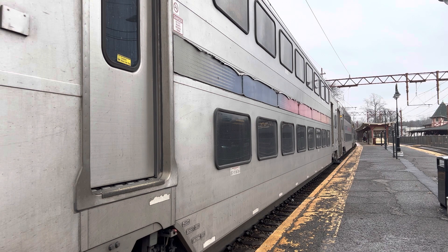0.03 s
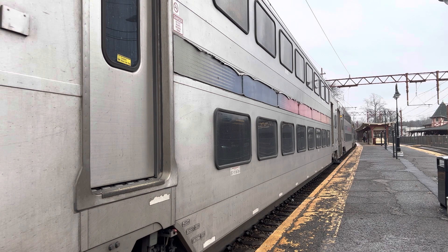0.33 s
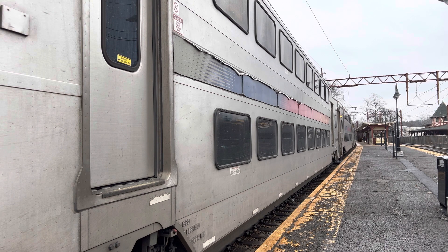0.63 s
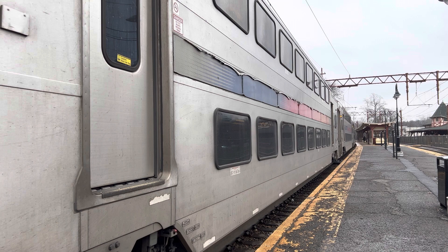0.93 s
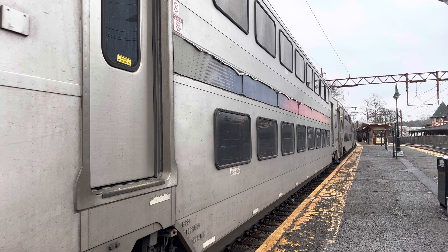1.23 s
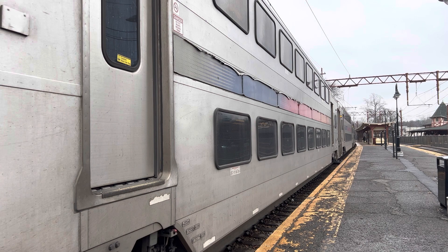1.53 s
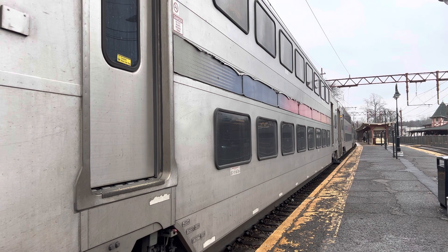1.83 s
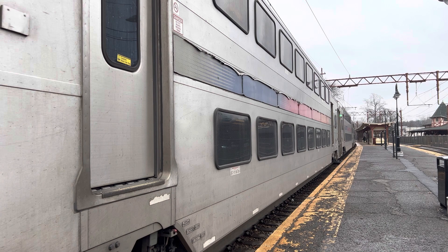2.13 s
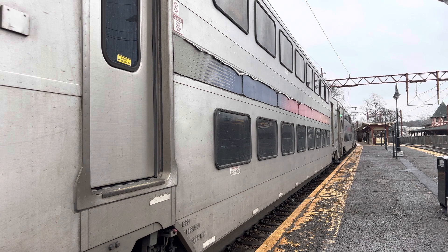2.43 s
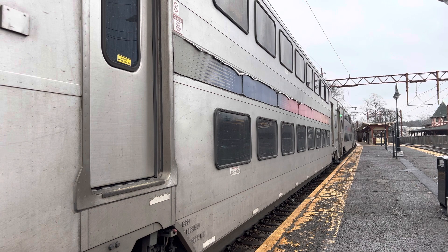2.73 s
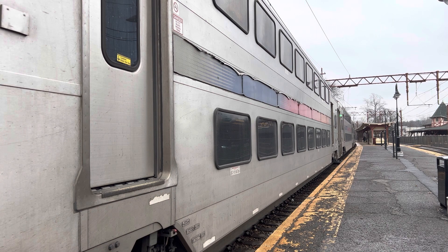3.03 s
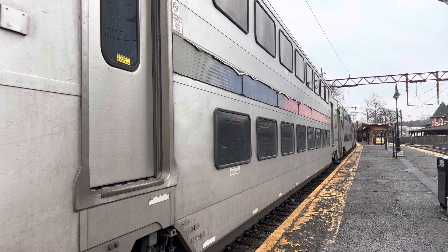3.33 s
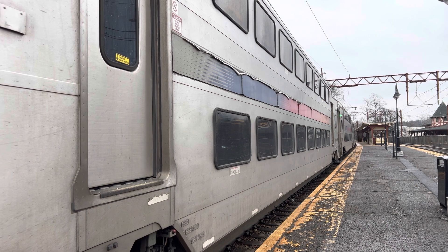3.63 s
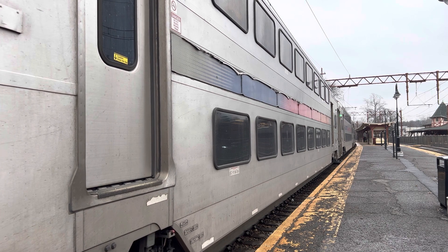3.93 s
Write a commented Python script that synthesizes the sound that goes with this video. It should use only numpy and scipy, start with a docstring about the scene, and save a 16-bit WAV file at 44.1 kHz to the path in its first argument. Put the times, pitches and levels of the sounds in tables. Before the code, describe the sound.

Air hisses loudly from a stopped train's brakes and slowly fades over a low rumble.

```python
"""A stopped passenger train lets the air out of its brakes, heard from the platform.
At first an earlier hiss is dying away over machinery that rumbles, blows and hums throughout.
At 0.44 s the valve opens with a bright spurt; the jet hisses, spits and roars in the hollow under the car.
As the pressure drains, pipe resonances sing out in turn, while a motor speeds up and slows again.
By the end the jet has sunk into a soft wash of air from cars further down the train."""
import sys
import numpy as np
from scipy import signal
from scipy.fft import rfft, irfft, next_fast_len
from scipy.io import wavfile
from scipy.ndimage import map_coordinates

SR = 44100
rng = np.random.default_rng(int(sys.argv[2]) if len(sys.argv) > 2 else 0)


def wrap_up_sound(samples):
    """Save the sound to the file named by the first command line argument, as 16-bit audio."""
    columns = np.atleast_2d(samples).T
    # keep every value between -1 and 1, then stretch to whole-number steps
    tamed = np.clip(columns, -1, 1)
    steps = np.round(tamed * 32767).astype(np.int16)
    wavfile.write(sys.argv[1], SR, steps)


N = 176400
TIME = np.arange(N) / SR


def amp(db):
    """Decibels to gain."""
    return 10 ** (np.asarray(db) / 20)


def along(points, hz):
    """A curve over frequency, read on a log axis."""
    f, values = np.transpose(points)
    return np.interp(np.log(hz + 1), np.log(f + 1), values)


def colour(points):
    """An EQ curve as a gain function of frequency."""
    return lambda f: amp(along(points, f))


def peak(f, hz, width):
    """Gain of one resonance with steep skirts."""
    return 1 / (1 + ((f - hz) / (.78 * width)) ** 2)


def wobble(rate):
    """Smooth random modulation, rate knots a second."""
    return map_coordinates(rng.standard_normal(int(N * rate / SR) + 4), [TIME * rate])


def filtered(x, response):
    """x through a complex frequency response."""
    size = next_fast_len(N + SR // 2)
    return irfft(rfft(x, size) * response(np.fft.rfftfreq(size, 1 / SR)), size)[..., :N]


def rush(gain, correlation):
    """Stereo noise of rms 1 with the given EQ and left-right correlation."""
    def mid_side_gain(f):
        spread = np.arccos(np.clip(along(correlation, f), -1, 1)) / 2
        return gain(f) * np.array([np.cos(spread), np.sin(spread)])
    mid, side = filtered(rng.standard_normal((2, N)), mid_side_gain)
    noise = np.array([mid + side, mid - side])
    return noise / np.sqrt(np.mean(noise ** 2) + 1e-20)


def tone(hz, waver_hz=1, flutter_db=2.2, rate=5.99):
    """A sine that wavers in pitch and flutters in level, rate times a second."""
    phase = 2 * np.pi * np.cumsum(hz + waver_hz * wobble(rate)) / SR
    return amp(flutter_db * wobble(rate)) * np.sqrt(2) * np.sin(phase)


def drain(start_s, attack_s, fall_db_per_s, steepen_db_per_s2=0):
    """Valve envelope: a quick attack, then a fall that can steepen as the pipe empties."""
    age = TIME - start_s
    opening = (1 + np.tanh(age / attack_s / 2)) / 2
    open_s = np.maximum(age, 0)
    return opening * amp(-fall_db_per_s * open_s - steepen_db_per_s2 * open_s ** 2)


# Low-end EQ of the machinery: f/Hz, relative level/dB
RUMBLE_EQ = [(20, -32), (44, 1), (80, 2.5), (125, -1.5), (165, -6.5), (210, -8.5), (300, -15.5), (400, -20),
             (520, -26.5), (900, -79)]
# Fader ride of the rumble: t/s, level/dB
RUMBLE_RIDE = [(0, -33.5), (.17, -29), (.27, -34), (.75, -34), (1.7, -37), (2.3, -36.5), (3.102, -37.5),
               (4, -36.5)]
# Stereo image of the rumble: f/Hz, left-right correlation
RUMBLE_IMAGE = [(40, .6), (150, .7), (400, .6)]

def rumble():
    """The idling machinery lays down a low, gently heaving bed."""
    level_db = np.interp(TIME, *np.transpose(RUMBLE_RIDE)) + .7 * wobble(15)
    return amp(level_db) * rush(colour(RUMBLE_EQ), RUMBLE_IMAGE)


# Mid-heavy EQ of the blower air: f/Hz, relative level/dB
BLOWER_EQ = [(250, 0.5), (450, -2), (850, 4), (1100, -6), (1600, -2), (2500, -4.5), (6000, -14),
             (12200, -31)]
# Wide image of diffuse air: f/Hz, left-right correlation
DIFFUSE_IMAGE = [(400, 0), (1500, 0), (3500, 0.12), (6000, 0)]

def blowers():
    """The blowers push a steady, wide wash of air."""
    return amp(-42.5) * rush(colour(BLOWER_EQ), DIFFUSE_IMAGE)


# Tones of the equipment: f/Hz, level/dB
HUM_TONES = [(77, -53), (160, -51)]

def equipment_hum():
    """The equipment holds two low, slightly wavering notes."""
    return sum(amp(db) * tone(hz) for hz, db in HUM_TONES)


# Pitch and fader ride of the motor: t/s, f/Hz, level/dB
MOTOR_RIDE = [(0, 101, -55), (.95, 102, -44), (1.25, 117, -45), (1.5, 127.4, -43), (1.9, 129.1, -43.5),
              (2.9, 125.7, -48.5), (3.3, 119.7, -43.5), (3.55, 101.1, -50), (4, 97, -52)]

def motor():
    """A motor's drone glides up and back down with its speed."""
    times, hz, db = np.transpose(MOTOR_RIDE)
    return amp(np.interp(TIME, times, db)) * tone(np.interp(TIME, times, hz))


# Thin EQ of the earlier hiss: f/Hz, relative level/dB
EARLIER_HISS_EQ = [(500, -30), (1500, -4.5), (2300, 0.5), (4000, -3.5), (6500, 0.5), (8700, 6.5),
                   (10500, -4.5), (12200, -4.5)]
# Stereo image of the nearby escaping air: f/Hz, left-right correlation
AIR_IMAGE = [(500, .88), (2200, .85), (4400, .68), (5300, .2), (6800, .35), (8200, .85), (11000, .85),
             (15000, .8)]

def earlier_hiss(fall_db_per_s=9.5):
    """The tail of an earlier release drains away."""
    return amp(-31.5 - fall_db_per_s * TIME) * rush(colour(EARLIER_HISS_EQ), AIR_IMAGE)


# Cues for the spits in the jet: t/s, level/dB
SPIT_CUES = [(.395, -34), (0.603, -16), (.99, -21), (3.26, -35)]

def spits(t60_s=.054):
    """The escaping air pops: midrange bursts with a hard attack and a short tail."""
    envelope = sum((TIME >= s) * amp(db - 60 * np.abs(TIME - s) / t60_s) for s, db in SPIT_CUES)
    return envelope * rush(lambda f: peak(f, hz=1640, width=580), AIR_IMAGE)


VALVE_OPEN_S = .44
JET_START_S, JET_ATTACK_S = VALVE_OPEN_S + .023, .016
# Resonances of the exhaust and the hollow under the car: f/Hz, width/Hz, relative level/dB
HOLLOW_MODES = [(626, 24, -1), (666, 22, -5), (840, 34, -6), (915, 22, -4), (981, 30, -1.5), (1178, 50, 3),
                (1228, 25, -2), (1328, 24, 2), (1386, 36, 2.5), (1481, 28, 1), (1550, 18, -4),
                (1660, 30, -2), (1718, 24, -1), (1772, 36, 0), (1826, 44, 3), (1862, 22, 1),
                (1919, 26, 1.5), (2054, 28, 3), (2158, 56, .5), (2257, 20, -2), (2347, 24, -6),
                (2650, 22, -4), (2835, 50, -8), (3098, 32, -4), (3250, 26, -7), (3465, 26, -9)]
# Broad EQ of the roar beneath those resonances: f/Hz, relative level/dB
ROAR_EQ = [(250, -27), (540, -20), (620, -10.5), (880, -11.5), (1120, -4), (1290, -47), (1420, -11),
           (2000, -42), (2450, -6.5), (2620, -13.5), (3300, -10), (4300, -22.5), (8000, -39)]

def roar(attack_s=.009):
    """The jet roars in the hollow under the car; a quieter, evenly fading layer lingers as it dies."""
    def hollow(f):
        mode_power = sum((amp(db) * peak(f, hz, width)) ** 2 for hz, width, db in HOLLOW_MODES)
        return np.sqrt(colour(ROAR_EQ)(f) ** 2 + mode_power)
    body = amp(-22.5) * drain(VALVE_OPEN_S, attack_s, fall_db_per_s=4, steepen_db_per_s2=1.98)
    linger = amp(-31) * drain(VALVE_OPEN_S, attack_s, fall_db_per_s=7)
    return amp(1.4 * wobble(14.1)) * np.hypot(body, linger) * rush(hollow, AIR_IMAGE)


# Duller EQ of the distant air: f/Hz, relative level/dB
FAR_EQ = [(450, -15.5), (640, 3), (900, -6), (1120, 0), (1450, 3), (1900, -2.5), (2300, -10.5),
          (3100, -5.5), (4600, -13.5), (6100, -6.5), (7300, -12), (9300, -13), (11500, -20.5), (13000, -36)]

def far_release():
    """The brakes of the cars further off vent too, diffuse and slow to fade."""
    flow = drain(VALVE_OPEN_S, JET_ATTACK_S, fall_db_per_s=.5)
    return amp(-40 + .61 * wobble(5.96)) * flow * rush(colour(FAR_EQ), DIFFUSE_IMAGE)


# Bright EQ of the jet: f/Hz, relative level/dB
HISS_EQ = [(500, -40), (2000, 3.5), (2800, -4), (3400, -3.5), (4800, -1), (6200, 2.5), (7100, 0),
           (8800, 4.5), (10800, 2), (12200, -10)]

def hiss():
    """The jet's long hiss fades as the pressure drains."""
    flow = drain(JET_START_S, JET_ATTACK_S, fall_db_per_s=8, steepen_db_per_s2=.47)
    return amp(-21.5 + .41 * wobble(14)) * flow * rush(colour(HISS_EQ), AIR_IMAGE)


def whistle():
    """A thin, short-lived whistle tops the start of the jet."""
    flow = drain(JET_START_S, JET_ATTACK_S, fall_db_per_s=32)
    return amp(-26) * flow * rush(lambda f: peak(f, hz=10990, width=110), AIR_IMAGE)


# Presence-heavy EQ of the opening spurt: f/Hz, relative level/dB
SPURT_EQ = [(200, -9), (520, -13), (900, -33), (1750, 6), (2600, 6), (5000, 2), (8000, 2), (10700, 2),
            (12200, -5.5)]

def spurt():
    """A bright burst of air leaves the newly opened valve and falls away fast."""
    flow = drain(VALVE_OPEN_S + .036, attack_s=.023, fall_db_per_s=24)
    return amp(-18 + .37 * wobble(28.4)) * flow * rush(colour(SPURT_EQ), AIR_IMAGE)


# Swells of the pipe resonances: f/Hz, level/dB, crest t/s, length/s
PIPE_NOTES = [(632, -52, 3, 1.6), (668, -50, 2.5, 1.4), (838, -51, 2, 1.4), (1005, -49, 2, .6),
              (1010, -54, 3.55, .5), (1178, -40, 1, .8), (1200, -46.5, 2.2, .7), (1326, -46, 2, .9),
              (1388, -43, 1.9, .6), (1386, -49, 3.2, 1.1), (1545, -53, 3.4, 1), (1727, -52, 3.75, .5),
              (1812, -37.5, 1.1, .6), (1848, -42, 2.3, .6), (1863, -51.5, 3.4, 1.2), (2054, -51, 2.4, 1),
              (2842, -48.5, 1.9, .4), (2842, -53.5, 3.4, .9), (3101, -46, 1.55, .35),
              (3101, -47.5, 2.32, .55), (3101, -55, 3.4, .5), (3385, -55, 2.5, .6), (3693, -55.5, 2.45, .7),
              (4118, -66, 3.6, .8), (5484, -61, 2.8, .45)]

def singing_pipes():
    """The air excites one narrow pipe resonance after another: rough tones that swell and fade."""
    notes = np.zeros(N)
    for hz, db, crest_s, length_s in PIPE_NOTES:
        swell = np.exp(-2 * ((TIME - crest_s) / length_s) ** 2)
        notes += amp(db) * swell * tone(hz, waver_hz=11, flutter_db=3.8, rate=30)
    return notes


# Panning of the nearby air: f/Hz, left minus right level/dB
AIR_PAN = [(300, -4), (700, 6.5), (1300, 3.5), (2400, 3.5), (4400, -1.7), (8000, -1.5), (15000, 1)]
# Phase offset of air arriving at a slant: f/Hz, left lead/rad
AIR_LEAD = [(200, 0), (700, -1.15), (1500, -1.1), (2800, -.1), (4900, 0), (6000, -3.4), (7200, -6.1),
            (8800, -6.2), (9600, -7.9), (10500, -9.3), (12200, -12.6), (14000, -15.7), (15400, -18.8)]

def platform(air, echo_db=-3.5, t60_s=.081, highpass_hz=3400):
    """Reflections between car and platform ripple the treble; the sound arrives at a slant."""
    t = TIME[:SR // 4]
    tail = rng.standard_normal(len(t)) * amp(-60 * t / t60_s)
    echo = signal.fftconvolve(air, tail[None] / np.linalg.norm(tail), axes=1)[:, :N]
    bright_echo = filtered(echo, lambda f: 1 - 1 / (1 + (f / highpass_hz) ** 4))
    sides = np.array([[.5], [-.5]])  # half the offset to each channel
    slant = lambda f: amp(sides * along(AIR_PAN, f)) * np.exp(1j * sides * along(AIR_LEAD, f))
    return filtered(air + amp(echo_db) * bright_echo, slant)


def scene():
    """The mix: near and distant brake air over the bed of the idling train."""
    machinery = rumble() + blowers() + equipment_hum() + motor()
    near_air = earlier_hiss() + spits() + roar() + hiss() + whistle() + spurt() + singing_pipes()
    return machinery + platform(near_air) + far_release()


def record(dry, top_hz=16000):
    """A brick-wall low-pass trims the very top of the mix."""
    return filtered(dry, lambda f: f < top_hz)


dry = scene()
out = record(dry)
wrap_up_sound(out)
```